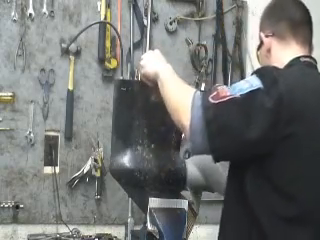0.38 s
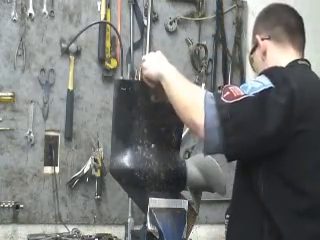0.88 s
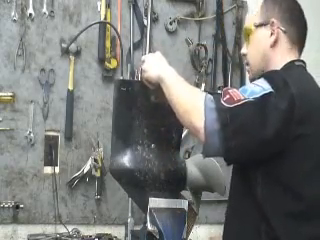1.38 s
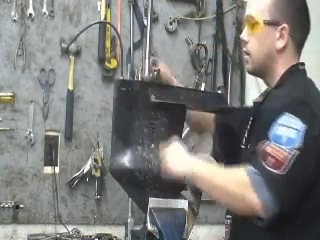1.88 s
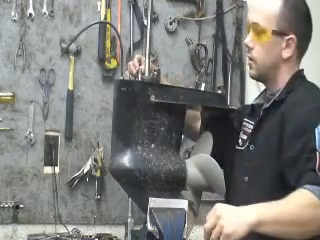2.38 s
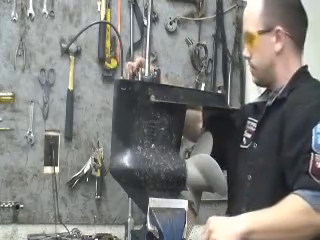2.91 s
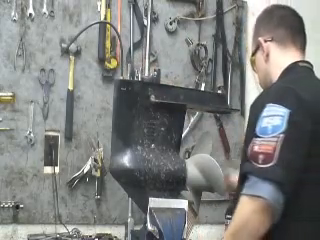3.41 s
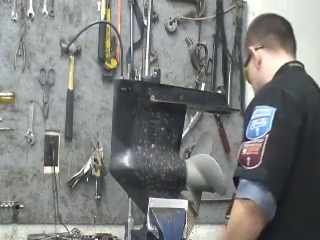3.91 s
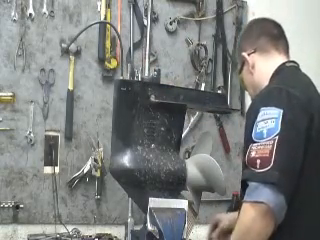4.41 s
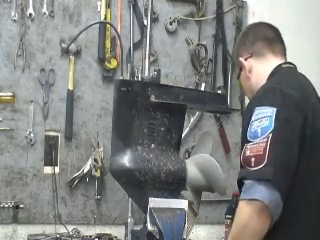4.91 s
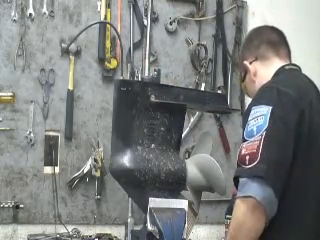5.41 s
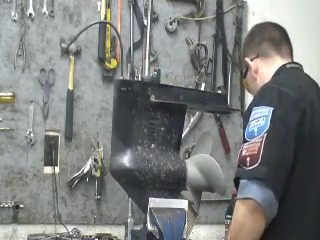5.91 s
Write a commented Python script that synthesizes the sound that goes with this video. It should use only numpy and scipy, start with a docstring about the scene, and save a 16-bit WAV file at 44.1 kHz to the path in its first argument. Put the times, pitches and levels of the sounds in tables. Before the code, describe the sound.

In a quiet reverberant workshop, a metal drawer rolls and bangs with rattling tools, a hollow object bounces down, and a broad hiss begins.

```python
"""A quiet, echoing workshop, heard in stereo from a few metres off, with ventilation rumble and microphone hiss.
A steel tool drawer rolls on its runners and bumps its stop, and the tools inside clank: shaped noise and ringing
modes. Small steel parts tick and a hollow object is set down with a bounce: short noise blows and short rings.
Something thin crackles, and a broad hiss starts at the end: gritty noise whose level rises and falls.
Everything but the background rings the room: direct sound, a clump of early echoes and a long tail."""
import sys
import numpy as np
from scipy import signal
from scipy.fft import rfft, irfft
from scipy.io import wavfile
from scipy.ndimage import uniform_filter1d

SR = 44100
rng = np.random.default_rng(int(sys.argv[2]) if len(sys.argv) > 2 else 0)


def voltage_ratio(level):
    """Linear amplitude factor for a level in decibels (scalar or array-like)."""
    return 10 ** (np.asarray(level, float) / 20)


def transcribe(signal):
    """Save signal, clipped to [-1, 1], as a 16-bit WAV file at the path in sys.argv[1]."""
    frames = np.atleast_2d(signal).T
    limited = np.clip(frames, -1, 1)
    pcm = np.round(limited * 32767).astype(np.int16)
    wavfile.write(sys.argv[1], SR, pcm)


N = 266968
T = np.arange(N) / SR  # time [s]

# Source levels in the tables are before the room and the distance are applied.
# tone of small loose tools rattling: (frequency [Hz], relative level [dB])
LOOSE_TOOL_TONE = [(1500, -31), (3500, -21), (5200, -10.5), (6000, 0.5), (6700, 3.5), (7500, 0),
                   (9000, -3.5), (12000, -12), (16000, -19)]


def unit(x):
    """Scales x to rms 1."""
    return x / np.sqrt(np.mean(x ** 2))


def over_hz(points, n):
    """Reads a (Hz, value) table at the bins of an n-sample spectrum, on a log frequency axis."""
    hz, value = np.transpose(points)
    bin_hz = np.arange(n // 2 + 1) * SR / n
    return np.interp(np.log(bin_hz + 1), np.log(hz), value)


def colour(x, tone):
    """Filters x to the (Hz, dB) shape and scales it to rms 1."""
    return unit(irfft(rfft(x) * voltage_ratio(over_hz(tone, len(x))), len(x)))


def grit(rough_db, share):
    """Noise with a share of its samples made louder by random amounts, like dense tiny collisions."""
    boost_db = rough_db * np.minimum(rng.exponential(size=N), 3)
    size = np.where(rng.random(N) < share, voltage_ratio(boost_db), 1)
    return rng.standard_normal(N) * size


def rise(s, attack_s):
    """0 before s, then a smooth climb to 1 that takes attack_s."""
    return np.sin(np.pi / 2 * np.clip((T - s) / attack_s, 0, 1)) ** 2


def trails(times, dbs, t60, attack_s):
    """Envelope that climbs quickly at each time and falls 60 dB every t60 seconds; overlapping powers add."""
    power = 0
    for s, db in zip(times, dbs):
        fall_db = 60 * np.maximum(T - s, 0) / t60
        power = power + (rise(s, attack_s) * voltage_ratio(db - fall_db)) ** 2
    return np.sqrt(power)


def blows(times, dbs, spreads, tone, onset=0.15, count=4096):
    """Short blows: a click's smooth spectrum, smeared in time by many tiny contacts; scaled by estimated peak."""
    out, shape = np.zeros(N + count), voltage_ratio(over_hz(tone, count))
    for s, db, spread_s in zip(times, dbs, spreads):
        t = T[:count] / spread_s  # time in spreads; onset is in the same unit
        envelope = (1 - np.exp(-t / onset)) * np.exp(-t)
        blow = rng.standard_normal(count)
        # alternate between the wanted envelope and the wanted spectrum
        for _ in range(4):
            phase = np.angle(rfft(blow * envelope))
            blow = irfft(shape * np.exp(1j * phase), count)
        blow = blow * np.exp(-np.maximum(t - 3, 0))
        peak = 2 * np.sqrt(np.sum(blow ** 2) / (spread_s * SR))
        out[int(s * SR):][:count] += voltage_ratio(db) * blow / peak
    return out[:N]


def strike(times, dbs, modes, contact_s, scatter_db):
    """Each blow rings the modes anew, with random shares and phases; its peak is scaled to the blow's dB."""
    out, t = np.zeros(N + SR), T[:SR // 2]
    hz, db, t60 = (column[:, None] for column in np.transpose(modes))
    for s, blow_db in zip(times, dbs):
        chance = rng.standard_normal((len(modes), 2))
        level = voltage_ratio(db + scatter_db * chance[:, :1])
        decay = np.exp(-np.log(1000) * t / t60)
        ring = level * decay * np.sin(2 * np.pi * hz * t + chance[:, 1:])
        ring = ring.sum(0) * (1 - np.exp(-t / contact_s))
        out[int(s * SR):][:len(t)] += voltage_ratio(blow_db) * ring / np.abs(ring).max()
    return out[:N]


def air():
    """Steady rumble, a distant murmur of machines, hiss and fan hum; noise alike left and right in the bass."""
    # ventilation and microphone noise: (frequency [Hz], relative level [dB])
    air_tone = [(20, -15), (55, -2.5), (116, -8), (182, -13.5), (410, -19), (976, -23), (1860, -29.5),
                (2820, -33.5), (4540, -38), (7950, -39.5), (11200, -42.5), (11500, -35.5), (15800, -41),
                (16200, -60)]
    # how alike left and right are: (frequency [Hz], likeness [0-1])
    likeness = [(60, 0.99), (130, 1), (290, 0.65), (640, 0.25), (1400, 0), (7000, 0)]
    # fan hum: (frequency [Hz], rms level [dB])
    fan_tones = [(50, -58.5), (100, -74.5), (179, -61.5)]
    # gains of three bands of the noise
    rumble_gain_db, murmur_gain_db, hiss_gain_db = -51.5, -49.5, -46.5
    swell_s, swell_width_s, swell_db = 1.72, 0.6, 4  # the murmur swells once

    alike, shape = over_hz(likeness, N), voltage_ratio(over_hz(air_tone, N))
    mid, side = rfft(rng.standard_normal((2, N))) * shape * np.sqrt([1 + alike, 1 - alike])
    pair = unit(irfft([mid + side, mid - side], N))
    below_250 = signal.sosfiltfilt(signal.butter(2, 250, fs=SR, output="sos"), pair)
    below_1500 = signal.sosfiltfilt(signal.butter(2, 1500, fs=SR, output="sos"), pair)
    rumble = voltage_ratio(rumble_gain_db) * below_250
    swell = swell_db * np.exp(-((T - swell_s) / swell_width_s) ** 2)
    murmur = voltage_ratio(murmur_gain_db + swell) * (below_1500 - below_250)
    mic_hiss = voltage_ratio(hiss_gain_db) * (pair - below_1500)
    # each hum tone's phase wanders slowly
    drift = uniform_filter1d(rng.standard_normal((len(fan_tones), N)), 4000).cumsum(1)
    hum = 0
    for (hz, db), wander in zip(fan_tones, drift):
        hum = hum + voltage_ratio(db) * np.sqrt(2) * np.sin(2 * np.pi * hz * T + 0.0288 * wander)
    return rumble + murmur + mic_hiss + hum


def hiss():
    """A faint leak builds up, then a broad gritty hiss swells in and sags."""
    # (frequency [Hz], relative level [dB])
    hiss_tone = [(59, -42), (100, -21), (185, -6.5), (219, -16), (302, -5), (365, -12.5), (433, -7),
                 (950, -5.5), (1030, -7), (1480, -5), (3250, -11.5), (14100, -16), (16000, -15.5)]
    leak_start_s, leak_db = 5.66, -48
    start_s, attack_s, full_db, sag_db_per_s = 5.886, 0.031, -32, -23
    leak = rise(leak_start_s, start_s - leak_start_s) * voltage_ratio(leak_db)
    sag_db = sag_db_per_s * np.maximum(T - start_s, 0)
    full = rise(start_s, attack_s) * voltage_ratio(full_db + sag_db)
    return (leak + full) * colour(grit(2.3, 0.011), hiss_tone)


def crackle():
    """Something thin is crumpled: each snap is a noise blow followed by gritty noise that dies away."""
    # loudest crackles and rustles: (time [s], peak level [dB], spread [s])
    snaps = [(2.02, -58, .03), (2.27, -54.5, 0.016), (2.99, -56, .03), (3.045, -56, .008),
             (5.114, -33.5, 0.0045), (5.129, -30, 0.013), (5.22, -44, 0.0041), (5.261, -35.5, 0.0081),
             (5.352, -35.5, 0.0054), (5.466, -32, 0.015), (5.7087, -46, 0.0056)]
    # (frequency [Hz], relative level [dB])
    crackle_tone = [(300, -10.5), (700, -18), (1500, -10.5), (2600, -9), (4500, -9.5), (6500, -8),
                    (9000, -14.5), (14500, -21), (16000, -30)]
    trail_db, trail_t60_s = -11, 0.53  # level over the snap, time to fall 60 dB
    s, db, spread_s = np.transpose(snaps)
    grains = trails(s, db + trail_db, trail_t60_s, 0.0074) * colour(grit(3.9, 0.019), crackle_tone)
    return grains + blows(s, db, spread_s, crackle_tone)


def ticks():
    """Small steel parts touch: a high ring, a lower clink and a hard broad edge."""
    # (time [s], peak level of the high ring [dB], clink level over it [dB], edge level over it [dB])
    touches = [(1.4694, -56, -5, 3), (2.458, -51.5, -9, -15), (2.6914, -36.5, -7, -13),
               (2.8132, -46, -6, -6), (2.8294, -49, -2, -7), (2.9714, -47.5, -8, -6), (3.03, -57, -1, -4),
               (3.888, -53.5, -12, 5)]
    # high ring: (frequency [Hz], relative level [dB], time to fall 60 dB [s])
    high_modes = [(6650, -2, 0.0081), (7100, -10, .015), (7460, 0, 0.012), (7890, -5.5, 0.039),
                  (8150, -3, 0.022), (9320, -11, 0.01), (13400, -9, 0.015)]
    # lower clink: (frequency [Hz], relative level [dB], time to fall 60 dB [s])
    clink_modes = [(2600, -5, .01), (2850, 0, .012), (3472, -6, .01), (4300, -8, .01)]
    # hard edge: (frequency [Hz], relative level [dB])
    edge_tone = [(1500, -26), (5000, 14), (14000, 6)]
    s, db, clink_db, edge_db = np.transpose(touches)
    ring = strike(s, db, high_modes, 0.0001, 2.0)
    clink = strike(s, db + clink_db, clink_modes, 0.00026, 1.8)
    edge = blows(s, db + edge_db, np.full(len(s), .003), edge_tone)
    return ring + clink + edge


def knocks():
    """A hollow object lands and bounces: a broad slap on the bench and a few short ringing modes."""
    # (time [s], peak level of the slap [dB], slap spread [s], ring level over it [dB])
    landings = [(5.339, -22, 0.0061, -1), (5.345, -9.5, 0.0097, -1), (5.463, -15.5, .01, -5.5),
                (5.547, -26.5, 0.0112, -17), (5.83, -40, 0.01, -3)]
    # (frequency [Hz], relative level [dB], time to fall 60 dB [s])
    hollow_modes = [(697, -4, 0.042), (706, -10, 0.082), (880, 5, 0.042), (1040, -24, 0.023),
                    (1343, 7, 0.03), (1520, -16, 0.028)]
    # (frequency [Hz], relative level [dB])
    slap_tone = [(150, -27.5), (250, -22.5), (400, -12), (560, -12), (735, -0.5), (900, -9.5),
                 (1310, -11.5), (1700, -13.5), (2300, -20.5), (3650, -30.5), (11900, -45), (16000, -59)]
    s, db, spread_s, ring_db = np.transpose(landings)
    ring = strike(s, db + ring_db, hollow_modes, 0.0019, 1.3)
    return ring + blows(s, db, spread_s, slap_tone, onset=0.467)


def clanks():
    """Many tools jump at once, so their rings blur into one bright crash; small ones pull it to a high rattle."""
    # (time [s], peak level [dB], rattle spread [s], share of small loose tools [0-1])
    crashes = [(.925, -27, 0.015, 0.05), (0.978, -20.5, 0.0077, 0), (0.988, -21.5, 0.011, 0),
               (1.0, -15.5, 0.0059, 0.01), (4.008, -18.5, 0.0074, 0.19), (4.2, -38, 0.02, 0.8),
               (4.422, -17, 0.0093, 0.2), (4.496, -24, 0.013, 0.5), (4.568, -9, 0.021, 0.3)]
    # heavy steel tools: (frequency [Hz], relative level [dB])
    heavy_tone = [(200, -14), (600, -3.5), (1400, 4), (2100, 2), (3000, -2), (4000, -3.5), (5100, -5),
                  (6000, -4), (6700, -2), (7600, -8), (9000, -12), (10600, -20), (13600, -20.5),
                  (16000, -28)]
    hz, heavy_db = np.transpose(heavy_tone)
    loose_hz, loose_db = np.transpose(LOOSE_TOOL_TONE)
    small_db = np.interp(np.log(hz), np.log(loose_hz), loose_db)
    out = 0
    for s, db, spread_s, share in crashes:
        tone_db = heavy_db + share * (small_db - heavy_db)
        out = out + blows([s], [db], [spread_s], np.transpose([hz, tone_db]), onset=0.031)
    return out


def drawer():
    """Rollers grind the runners and shake tools and panels; at the stop the panels boom and shudder."""
    # pushes: (start [s], getting up to speed [s], stop [s], runner level at start [dB], runner level at stop [dB])
    pushes = [(0.801, 0.024, 0.97, -45.5, -32.5), (1.02, 0.03, 1.38, -51, -60),
              (4.003, 0.0087, 4.1, -34.5, -39), (4.1, 0.12, 4.474, -30.5, -41)]
    # rollers jolting over rough spots: (time [s], peak level [dB], spread [s])
    jolts = [(3.985, -42, 0.01), (4.016, -22, 0.0066), (4.075, -23, 0.0089), (4.165, -26.5, 0.014),
             (4.225, -22, 0.012), (4.295, -42, 0.0086)]
    # drawer and bench bumps:
    # (time [s], peak level [dB], rattle spread [s], panel ring over it [dB], deep boom over it [dB])
    bumps = [(0.977, -24.5, 0.014, -5.5, -16), (.986, -19.5, .012, 1, -9), (4.418, -10.5, 0.013, -9.5, -20),
             (4.494, -19, 0.012, -3.5, -18), (5.187, -45.5, 0.011, 7, -16)]
    # grinding runners: (frequency [Hz], relative level [dB])
    runner_tone = [(180, -51), (300, -53), (392, -17), (494, -12.5), (678, -3.5), (961, -7.5), (1030, -5.5),
                   (2000, -3.5), (3130, -13), (6520, -16.5), (11100, -58.5), (14500, -28), (16000, -64)]
    # drawer panels: (frequency [Hz], relative level [dB])
    panel_tone = [(70, -45), (130, -17), (200, -7), (280, -5), (400, -1.5), (650, 0), (900, -10),
                  (1500, -11), (2500, -16.5), (5000, -32)]
    # panel ring: (frequency [Hz], relative level [dB], time to fall 60 dB [s])
    panel_modes = [(232, -1, 0.092), (268, 2.5, 0.142), (346, 5.5, 0.11), (371.3, -5.5, 0.21),
                   (402, -6, 0.13), (519, 6, 0.051)]
    # deep cabinet boom: (frequency [Hz], relative level [dB], time to fall 60 dB [s])
    cabinet_modes = [(110, -21, 0.072), (114, 8, 0.18), (135, 6, 0.12)]
    release_s, panel_db = 0.021, -9.5  # end of each push; panels over the runner
    loose_start_db, loose_stop_db = -14.5, -5.5  # over the runner: more tools shake loose as the push goes on
    uneven_db = 1.5  # rms waver of the grind
    # after a bump: level over the bump, time to fall 60 dB, runner and tools over the panels
    shudder_db, shudder_t60_s, shudder_runner_db, shudder_loose_db = -14, 0.32, -7.5, -17

    runner, loose, panel = (colour(grit(1.6, 0.0057), tone)
                            for tone in (runner_tone, LOOSE_TOOL_TONE, panel_tone))
    waver = uniform_filter1d(uniform_filter1d(rng.standard_normal(N), size=600), size=600)
    bumpy = voltage_ratio(uneven_db * unit(waver))
    out = blows(*np.transpose(jolts), runner_tone, onset=0.47)
    for start, attack_s, stop, start_db, stop_db in pushes:
        loose_db = np.interp(T, [start, stop], [loose_start_db, loose_stop_db])
        level = voltage_ratio(np.interp(T, [start, stop], [start_db, stop_db]))
        moving = rise(start, attack_s) * (1 - rise(stop, release_s)) * level
        out = out + bumpy * moving * (runner + voltage_ratio(loose_db) * loose + voltage_ratio(panel_db) * panel)

    s, db, spread_s, ring_db, deep_db = np.transpose(bumps)
    shudder = trails(s, db + shudder_db, shudder_t60_s, 0.015)
    out = out + shudder * (panel + voltage_ratio(shudder_runner_db) * runner + voltage_ratio(shudder_loose_db) * loose)
    thud = blows(s, db, spread_s, panel_tone, onset=0.303)
    ring = strike(s, db + ring_db, panel_modes, 0.00048, 2.1)
    boom = strike(s, db + deep_db, cabinet_modes, 0.0048, 1.5)
    return out + thud + ring + boom


def room(x):
    """Direct sound, dense echoes from near walls and benches, then the long tail; left and right differ."""
    # (frequency [Hz], time to fall 60 dB [s])
    room_t60 = [(60, 0.31), (250, 0.81), (1000, 0.7), (3000, 0.76), (8000, 0.49), (14000, 0.43)]
    early_db, early_s, late_db = 3.5, 0.019, 2.5  # echo energies are over the direct sound
    t = T[:SR]
    table_hz, table_t60 = np.transpose(room_t60)
    tail = 0
    # noise in octave bands, each with its own decay
    for hz in 45 * 2. ** np.arange(9):
        band = signal.butter(2, [hz, min(2 * hz, .47 * SR)], "band", fs=SR, output="sos")
        t60 = np.interp(np.log(1.74 * hz), np.log(table_hz), table_t60)
        noise = signal.sosfilt(band, rng.standard_normal((2, SR)))
        tail = tail + noise * np.exp(-np.log(1000) * t / t60)
    tail = tail * (1 - np.exp(-t / 0.013))
    early = rng.standard_normal((2, SR)) * (t > .003) * np.exp(-(t / early_s) ** 4)
    echo = 0
    for db, part in ((early_db, early), (late_db, tail)):
        echo = echo + voltage_ratio(db) * part / np.sqrt(np.sum(part ** 2) / 2)
    # the close microphone ports hear much of the echo alike
    shared = 0.77 * echo.mean(0) * np.sqrt(2)
    differing = 0.35 * (echo[0] - echo[1]) / np.sqrt(2)
    echo = shared + differing * np.array([[1], [-1]])
    return x + signal.fftconvolve(x[None], echo, axes=1)[:, :N]


def scene():
    """Everything at the bench rings the room; the ticks are nearer and drier; the background is added as is."""
    distance_db, tick_room_db = -6.5, 4.5
    near = ticks()
    far = hiss() + crackle() + knocks() + clanks() + drawer()
    bench = room(far + voltage_ratio(tick_room_db) * near) + near
    return voltage_ratio(distance_db) * bench + air()


def roll_off(x):
    """The treble ends steeply here."""
    return signal.sosfilt(signal.butter(12, 16660, fs=SR, output="sos"), x)


def record(dry):
    """Makes the highest treble the same in both channels and ends it sharply."""
    mono_hz, top_hz = 11300, 15850
    mid, side = (dry[0] + dry[1]) / 2, (dry[0] - dry[1]) / 2
    side = signal.sosfiltfilt(signal.butter(10, mono_hz, fs=SR, output="sos"), side)
    mid = signal.sosfiltfilt(signal.butter(30, top_hz, fs=SR, output="sos"), mid)
    return roll_off(np.array([mid + side, mid - side]))


dry = scene()
out = record(dry)
transcribe(out)
```